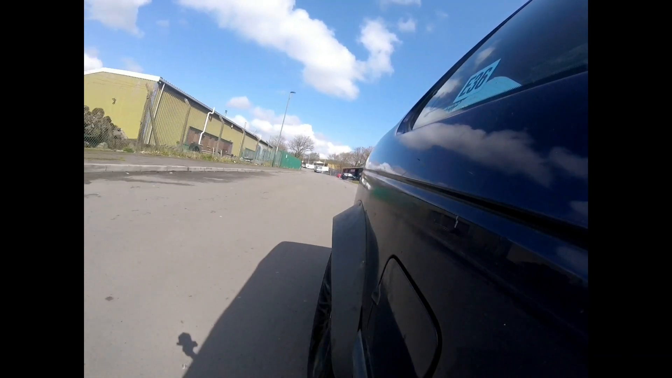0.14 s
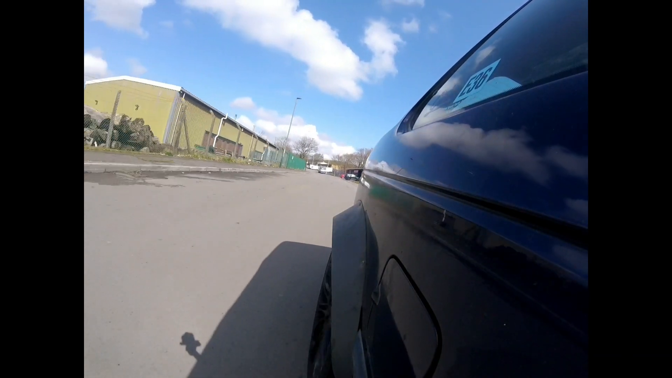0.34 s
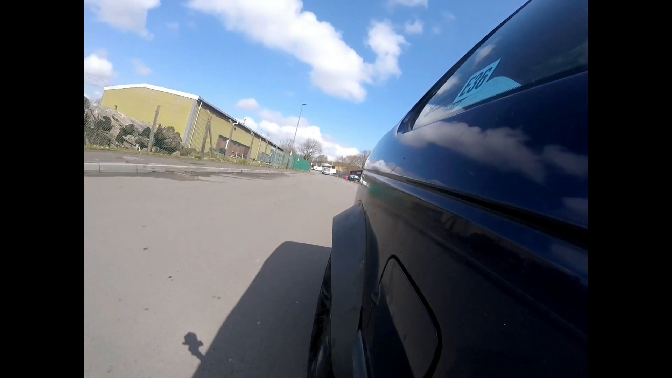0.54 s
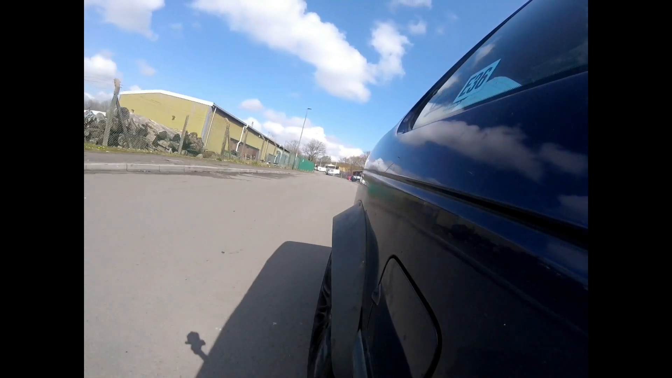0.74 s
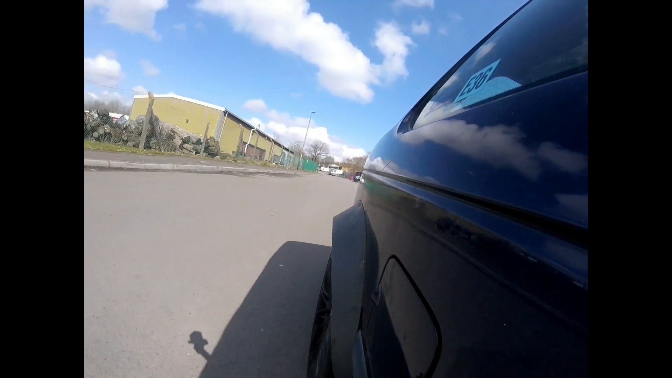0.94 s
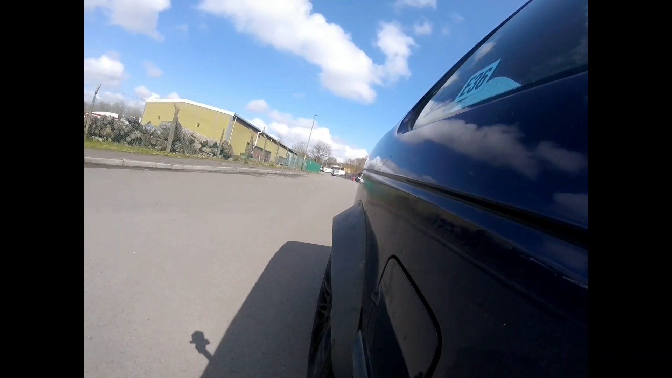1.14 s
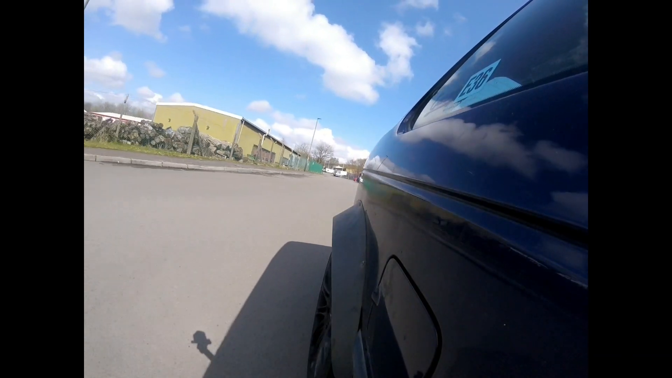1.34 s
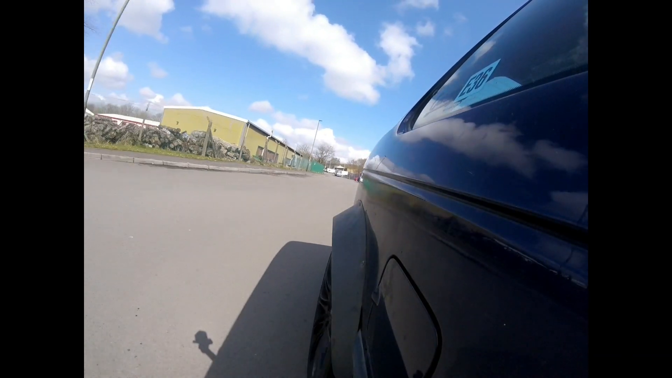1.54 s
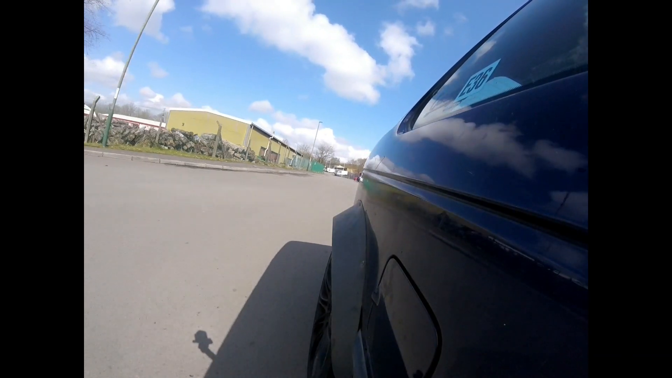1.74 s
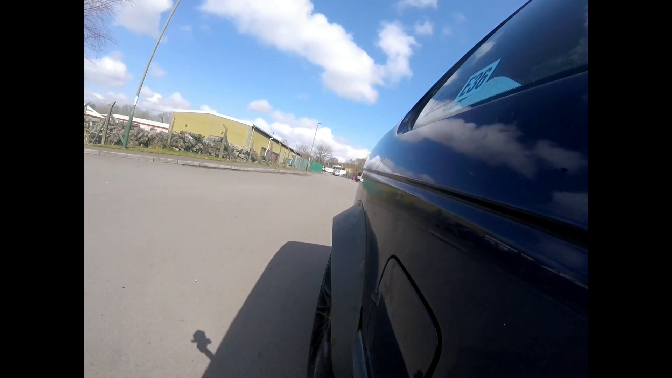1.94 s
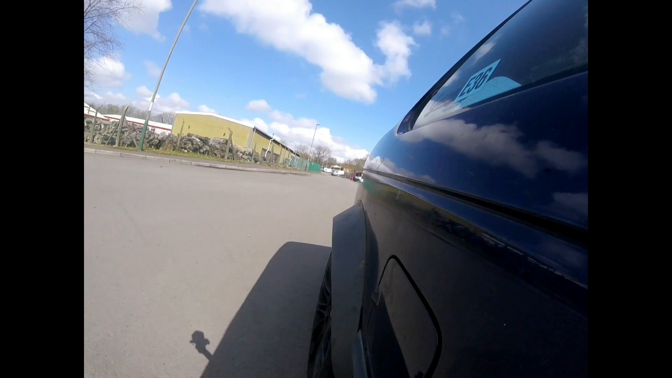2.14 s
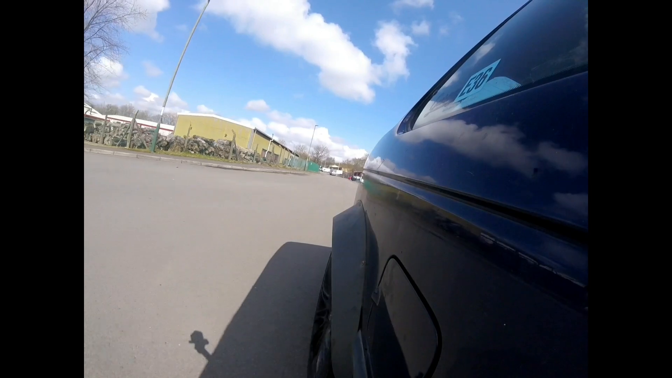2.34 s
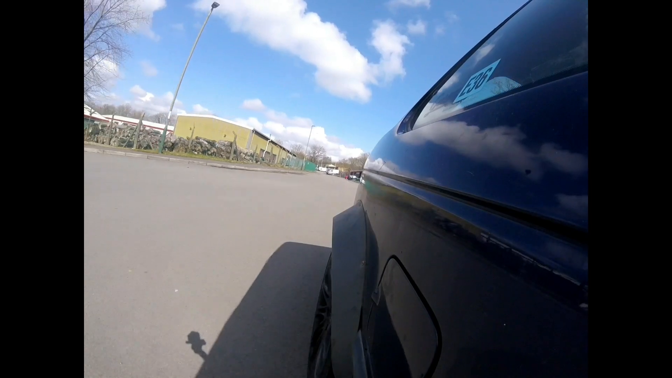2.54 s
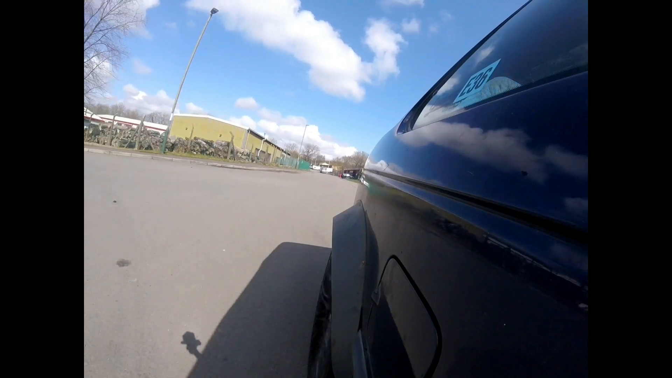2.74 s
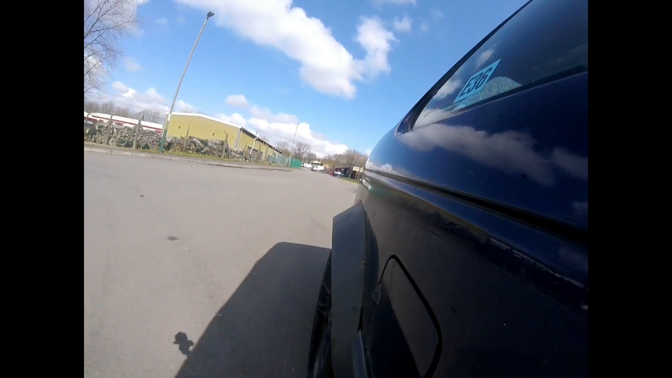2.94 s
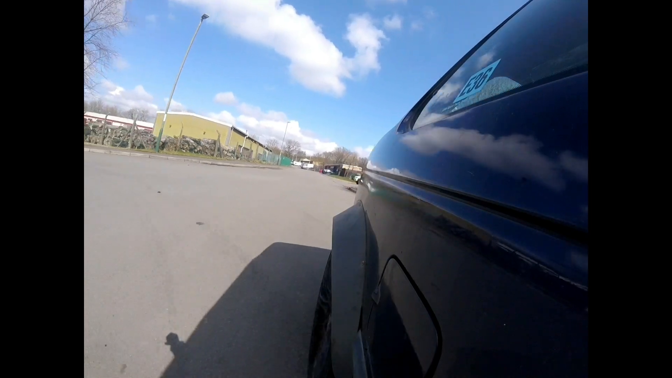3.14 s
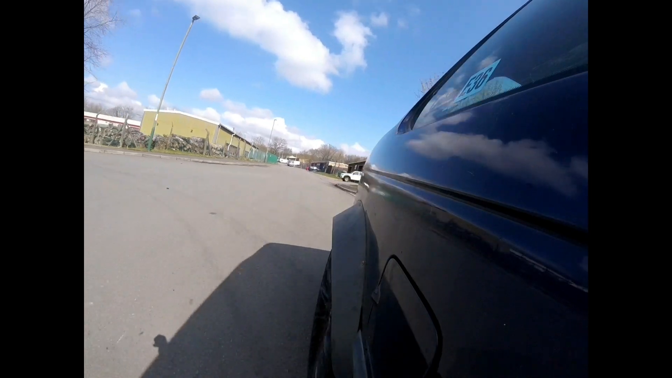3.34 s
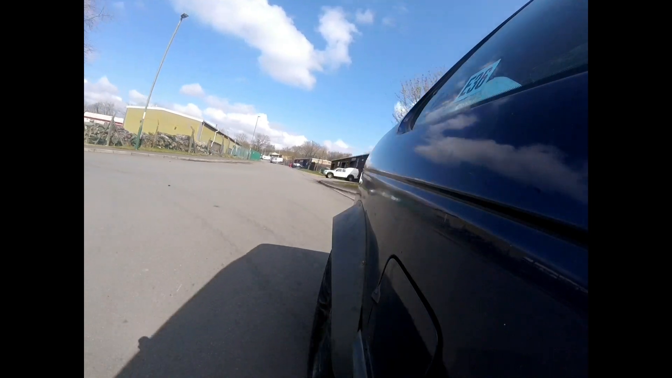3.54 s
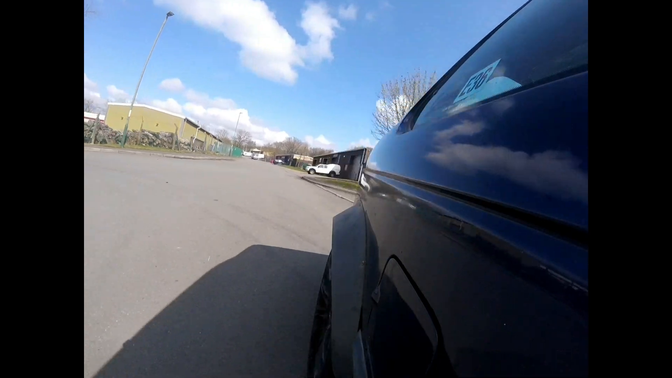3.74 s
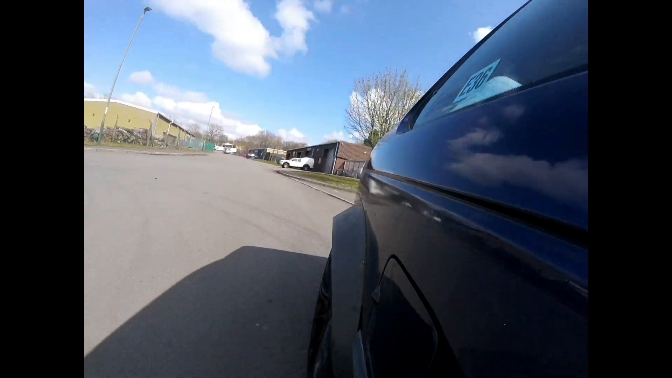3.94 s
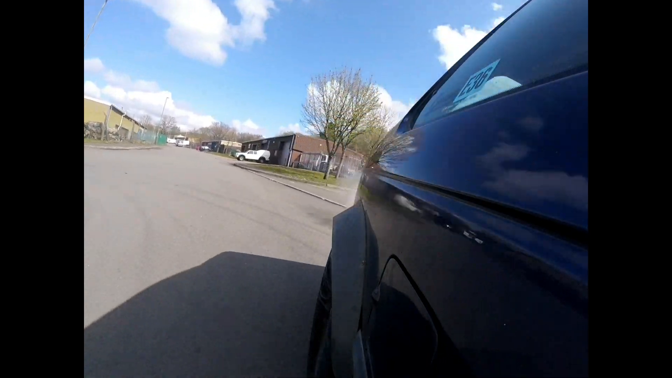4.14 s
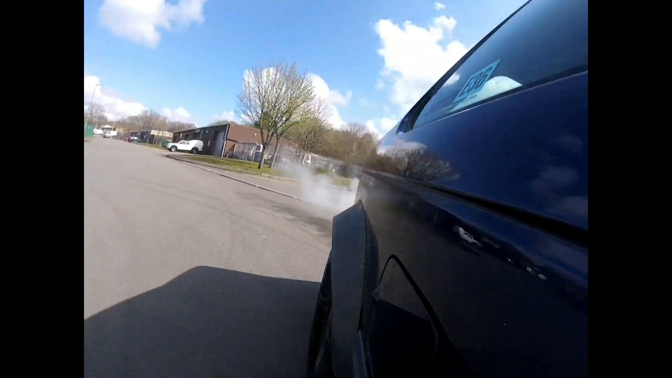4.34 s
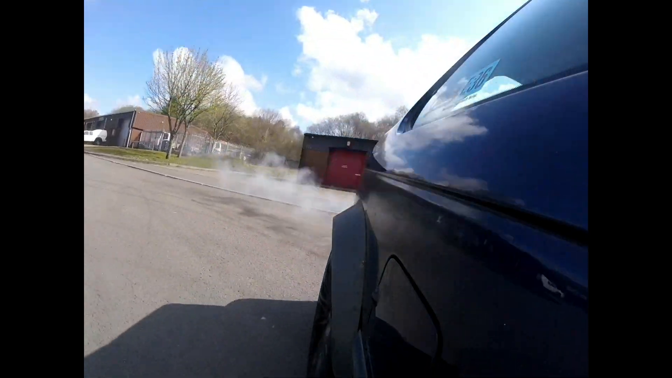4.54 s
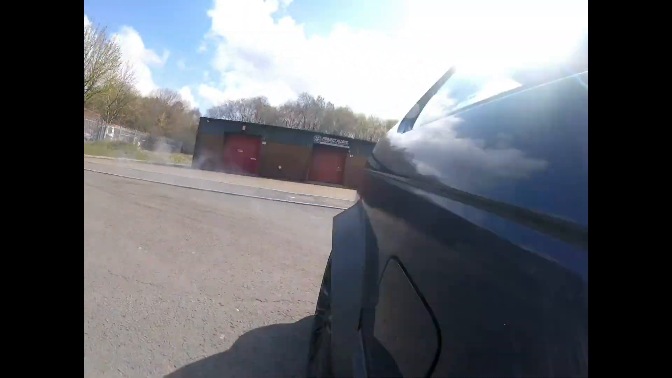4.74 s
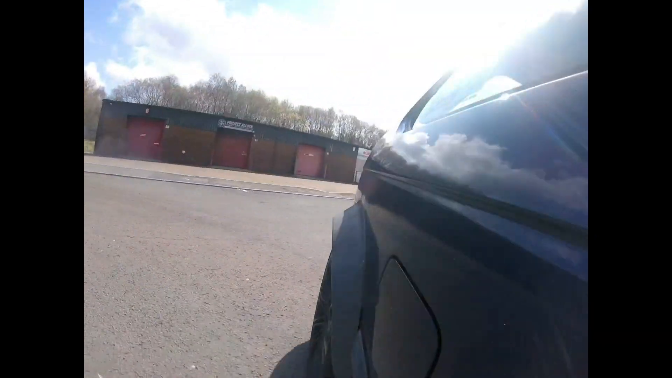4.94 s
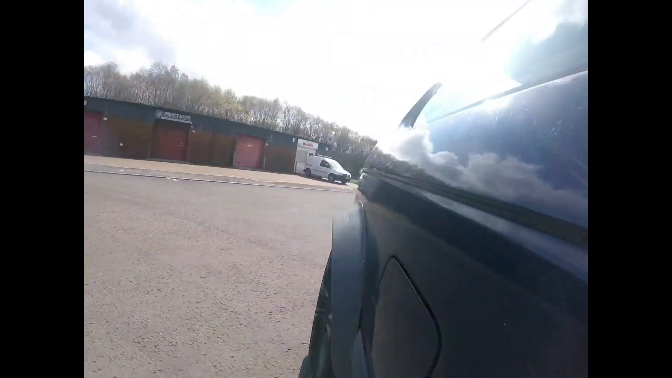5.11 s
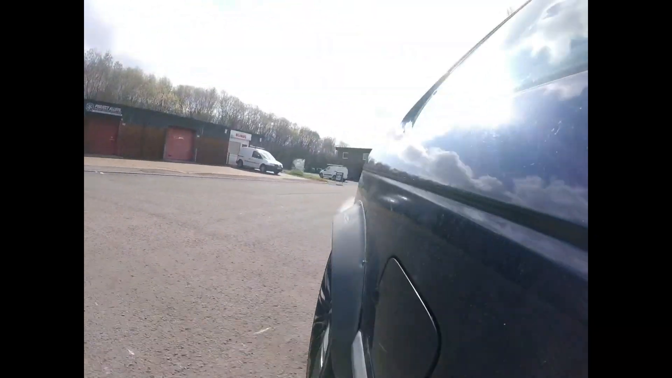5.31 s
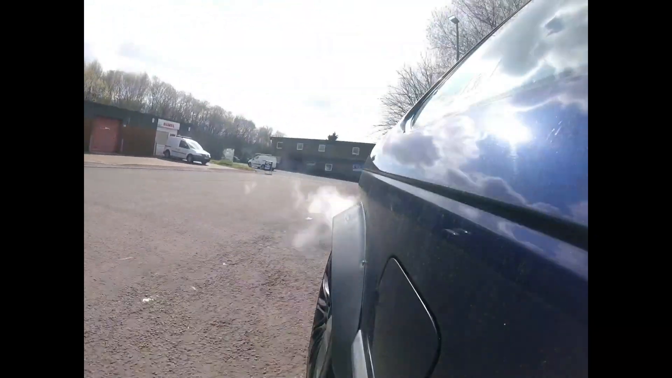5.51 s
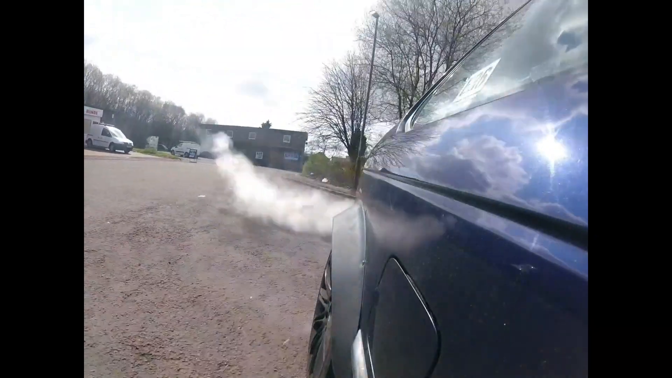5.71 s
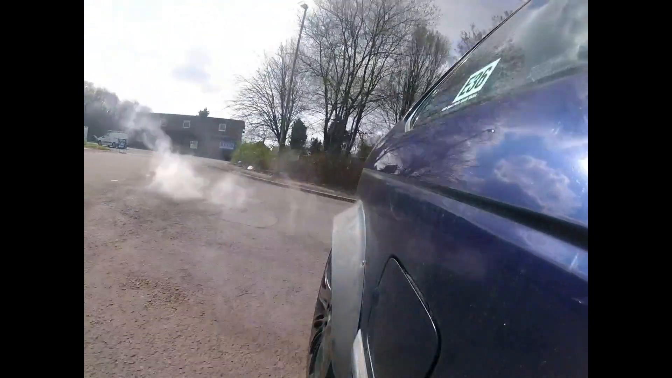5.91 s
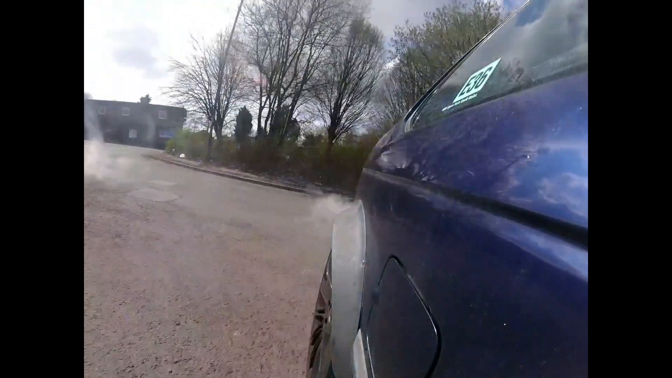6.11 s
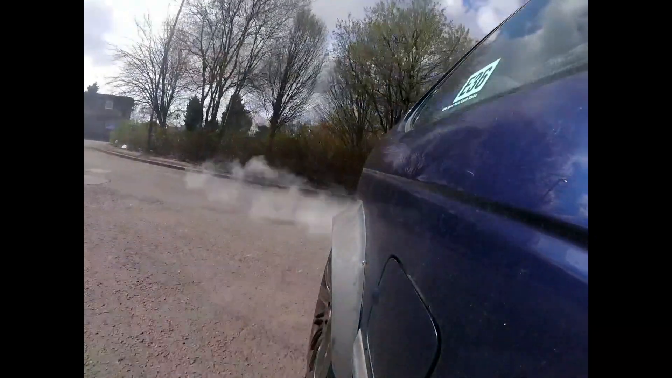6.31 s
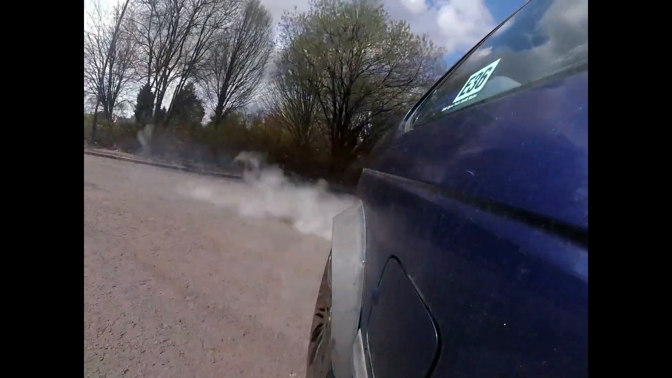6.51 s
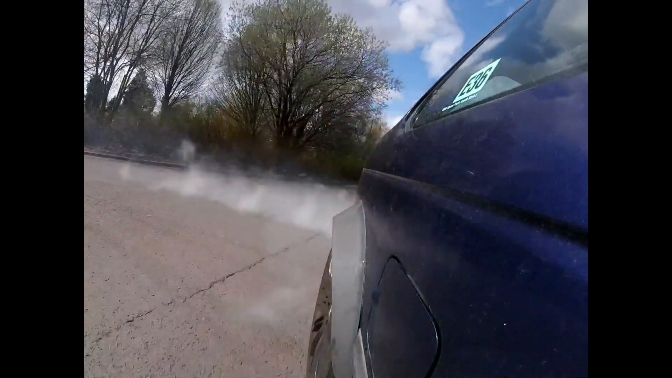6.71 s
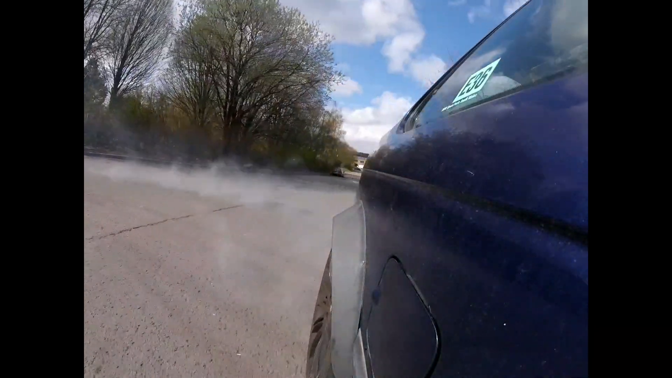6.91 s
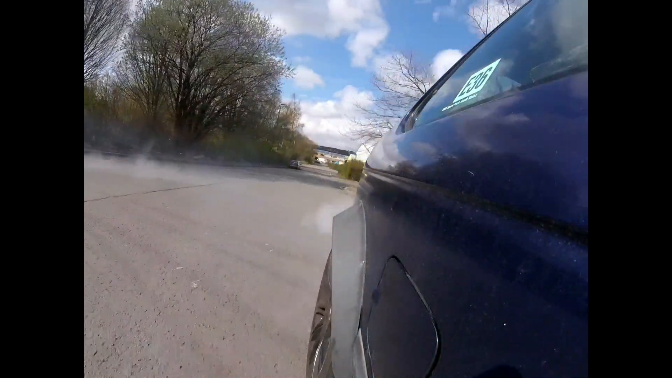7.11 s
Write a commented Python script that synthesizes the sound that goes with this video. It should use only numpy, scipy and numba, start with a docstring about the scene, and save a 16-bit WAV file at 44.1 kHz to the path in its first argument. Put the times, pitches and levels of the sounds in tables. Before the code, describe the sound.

A microphone mounted on the side of a car in an open car park catches wind thumps and a booming, humming roll over tarmac. After about three seconds the six-cylinder engine revs up steeply, the tyres chirp, then scrub and squeal continuously with gritty hiss. The note drops, pops thud in the pipe, and it surges again twice. Close, dry, bass-heavy and slightly saturated.

```python
"""Car rolling, revving and sliding

A six-cylinder car rolls across tarmac, then is revved hard and slides with spinning rear tyres.
The microphone sits in a small housing on its flank. Wind, panel boom, road roar and squeals are shaped noise;
the exhaust note is a stack of sine waves; stones and overrun pops are short rings that die away."""
import sys
import numpy as np
from scipy import signal
from scipy.fft import rfft, irfft
from scipy.io import wavfile
from scipy.ndimage import uniform_filter1d
from numba import njit

SR = 44100
rng = np.random.default_rng(int(sys.argv[2]) if len(sys.argv) > 2 else 0)


def wrap_up_sound(samples):
    """Save the sound to the file named by the first command line argument, as 16-bit audio."""
    columns = np.atleast_2d(samples).T
    # keep every value between -1 and 1, then stretch to whole-number steps
    tamed = np.clip(columns, -1, 1)
    steps = np.round(tamed * 32767).astype(np.int16)
    wavfile.write(sys.argv[1], SR, steps)


def volts_from_decibels(level):
    """Turn decibel levels (scalar or array-like) into linear amplitude factors."""
    exponent = np.asarray(level, float) / 20
    return 10 ** exponent


N = 320166
T = np.arange(N) / SR  # time of every sample in seconds

# Air and road around the rolling car. Each row: time in seconds, then levels in dB of wind buffet,
# panel boom, body drumming, rolling roar and air hiss.
DRIVE = [(0, -18.5, -43, -32, -36.5, -61.5), (.3, -21.5, -26, -29.5, -35.5, -59),
         (.65, -24.5, -22, -33, -35.5, -58), (.85, -24, -32, -30, -35.5, -58),
         (1.2, -20.5, -20.5, -29, -36, -57.5), (1.5, -16, -27, -28.5, -37.5, -55.5),
         (1.65, -18, -27.5, -32, -35.5, -56.5), (2.0, -24.5, -31, -34.5, -37.5, -55.5),
         (2.3, -22, -22.5, -35, -40, -58), (2.7, -26.5, -27, -35.5, -40, -57.5),
         (2.9, -27, -26, -35, -42.5, -58), (3.1, -21.5, -40, -39.5, -43, -59),
         (3.37, -27, -31, -38.5, -47.5, -58), (3.47, -24, -29, -33, -47, -60),
         (3.55, -33, -30, -29.5, -40, -54.5), (3.75, -28, -25, -31, -36, -50),
         (3.9, -30.5, -35, -29, -29.5, -48.5), (4.2, -38, -24, -32.5, -30, -42.5),
         (4.55, -24, -24, -24, -28, -52), (5.0, -24, -28.5, -32, -34.5, -62),
         (5.7, -17, -23, -25, -27.5, -48.5), (6.0, -23, -27.5, -29, -31, -57),
         (6.15, -26, -25, -29, -30, -64), (6.22, -20.5, -24, -33, -33, -58), (6.4, -28, -20, -27, -36, -48),
         (7.26, -22, -37, -33.5, -36, -54.5)]
# Colours of the wind buffet, body drumming, rolling roar and air hiss.
# Each row: frequency in Hz, relative strength in dB per Hz.
BUFFET_COLOUR = [(14, -39), (24, -7), (43, 2), (70, -6), (100, -6), (160, -15.5), (250, -28.5)]
BODY_COLOUR = [(110, -12.5), (170, -0.5), (200, -0.5), (280, -0.5), (350, -10.5), (500, -11.5)]
ROLL_COLOUR = [(190, -31), (330, -1.5), (495, 0.5), (622, -5), (800, -8), (1100, -9.5), (1300, -11),
               (2000, -17.5), (2900, -30), (4500, -47.5), (5850, -69)]
HISS_COLOUR = [(1800, -11), (2800, 1.5), (4200, -10.5), (5200, -5), (6500, -4), (8000, -7), (9600, -9),
               (10300, -25.5)]
# Strong wind thuds on the housing. Each row: start in seconds, strength in dB (3 dB above the top rms).
THUDS = [(0.044, -19), (0.903, -12), (1.058, -12), (1.489, -12), (3.067, -34), (3.56, -38), (3.64, -15),
         (3.78, -13), (5.41, -13.5), (5.572, -13.5), (6.37, -21)]
# Bumps in the tarmac that shake the panel. Each row: start in seconds, strength in dB (as for the thuds).
JOLTS = [(0.207, -16), (0.596, -28), (1.032, -24), (1.243, -16), (1.841, -31), (1.985, -12), (2.134, -20.5),
         (2.562, -17.5), (2.679, -18), (2.939, -18.5), (3.057, -20), (3.274, -24)]
THUD_RISE_S, JOLT_RISE_S = 0.026, 0.012  # time to the top of each swell
GUSTY_DB, BUMPY_DB = 1, 1.5  # spread of the quick swells of wind and boom
# The wavering pitch of the panel boom. Each row: time in seconds, pitch in Hz.
BOOM_PITCH = [(0, 124.4), (.3, 129.7), (.43, 137.4), (.52, 125.3), (.72, 137), (.95, 126), (1.1, 144),
              (1.28, 134), (1.42, 137.5), (1.7, 127), (1.86, 140.6), (2.0, 117.5), (2.17, 136.2),
              (2.38, 136.6), (2.46, 122.4), (2.62, 129), (2.8, 143), (3.0, 131.7), (3.35, 129.7),
              (4.5, 131.3), (5.38, 137.2), (6.03, 139), (6.18, 123), (6.33, 131.7), (6.45, 117.6),
              (6.65, 135), (7.26, 126)]
# The boom's tone, and the duller drumming around it; each width is for one of two filter passes
BOOM_WIDTH_HZ, BOOM_SKIRT_HZ, BOOM_SKIRT_DB = 18.8, 44.3, -12
BOOM_STEADY_S = 0.12  # the panel rings evenly over this time
# Tread hum. Each row: pitch in Hz, width of one filter pass in Hz, relative level in dB.
HUM_BANDS = [(505, 70, 3), (682, 20, 4.5), (905, 123, 8.5), (1030, 85, 7)]
HUM_DB, HUM_GAINS_DB_PER_S = -4, 1.28  # hum over the roar at time 0, and its gain on the roar each second
HUM_SWELL_DB, HUM_DRIFT, BODY_FLICKER_DB = 1.2, 0.015, 1.5  # drift is a fraction of the pitch

# Stones flung against the panel. Each row: start in seconds, strength in dB.
STONES = [(1.4446, -9), (1.4549, -21), (1.7095, -24), (3.375, -36), (3.648, -33), (3.749, -33)]
# Rings of the struck panel. Each row: pitch in Hz, relative level in dB, time to fall 60 dB in seconds.
PANEL_RINGS = [(1240, 3, 0.006), (835, -11, 0.03), (1010, -11, 0.03), (1600, -12, 0.015),
               (3130, -15, 0.005), (6560, -12, 0.0019), (9000, -14, 0.0022)]

# Grit spitting briefly in the treble. Each row: middle in seconds, level in dB, length in seconds.
SPITS = [(1.709, -51.5, 0.008), (3.375, -55, 0.0072), (3.485, -57, 0.02), (3.503, -49.5, 0.015),
         (3.565, -51, 0.022), (3.615, -48.5, 0.0097), (3.652, -44, 0.0065), (3.75, -51, 0.0068),
         (5.505, -42, 0.01), (6.24, -44, 0.005)]
# Colour of the grit. Each row: frequency in Hz, relative strength in dB per Hz.
GRIT_COLOUR = [(2200, -6.5), (3000, -4.5), (4300, -12.5), (5200, -6), (6500, -7.5), (8000, -10),
               (9200, -14.5), (10000, -26.5)]
# Rear tyres sliding. Each row: time in seconds, scrub level in dB, grit hiss level in dB.
SLIDE = [(3.4, -54, -71), (3.5, -42, -54.5), (3.58, -62, -75), (3.68, -46.5, -56.5), (3.72, -52, -56.5),
         (4.14, -35, -48), (4.165, -23.5, -42), (4.25, -25, -39), (4.31, -20, -40.5), (4.37, -25.5, -38.5),
         (4.46, -25, -38.5), (4.59, -22, -38), (4.75, -23.5, -44), (5.15, -20.5, -46), (5.45, -22, -45.5),
         (5.64, -24.5, -45), (5.77, -23.5, -45.5), (5.85, -22, -42), (5.97, -21, -45.5), (6.04, -23, -45.5),
         (6.14, -23, -49.5), (6.23, -24.5, -47.5), (6.5, -23, -47), (6.7, -22, -42), (6.91, -20, -39.5),
         (7.1, -21.5, -46.5), (7.26, -24.5, -43.5)]
# The wheel bites (boost) or skips clear of the road (dip).
# Each row: middle in seconds, change in dB, length in seconds.
HOPS = [(3.49, 9, 0.03), (3.67, 12, 0.066), (4.2, 1.5, 0.03), (4.37, -2.5, 0.018), (4.425, 7.5, 0.043),
        (4.47, -4, 0.03), (4.575, -5, 0.02), (4.502, 6.5, 0.026), (4.535, 4, 0.023), (4.612, 3, 0.037),
        (4.923, 2, 0.006), (4.956, 1, 0.006), (5.93, 2, 0.037), (6.24, 3, 0.01), (6.6, 2.5, 0.027)]

# Firing note, one list per stretch of revving. Each row: time in seconds, firing rate in Hz, note level in dB.
REVS = [
    [(3.36, 48.3, -45), (3.395, 55, -22), (3.43, 62.1, -21), (3.49, 72.3, -17.5), (3.576, 97.5, -17),
     (3.656, 124.5, -18.5), (3.794, 165.3, -15.5), (3.89, 202.8, -15), (3.996, 235.6, -11),
     (4.116, 261.2, -15), (4.2, 250.2, -14.5), (4.3, 261, -14.5), (4.45, 278.1, -18.5), (4.61, 298, -19.5),
     (4.69, 280, -21.5), (4.746, 260, -18), (4.808, 239.3, -30.5), (4.95, 230.3, -37)],
    [(5.24, 145.3, -34), (5.36, 154.5, -18), (5.44, 167.3, -20.5), (5.54, 185.3, -25), (5.76, 229.4, -15.5),
     (5.885, 253.6, -18), (5.91, 253, -33), (5.98, 264, -32)],
    [(6.2, 195.6, -32), (6.284, 208.3, -20), (6.476, 237.4, -15), (6.712, 274, -21), (6.882, 298.5, -19.5),
     (7.022, 286, -34), (7.038, 281.7, -22.5), (7.1, 260, -31), (7.158, 236, -31.5), (7.26, 239.2, -9.5)],
]
# Tones beside the firing note. Each value: pitch in sixths of the firing rate.
ORDERS = [1, 2, 3, 4, 5, 7, 8, 9, 10, 11, 12, 13, 14, 15, 16, 18, 20, 22, 24, 27, 30]
# Relative levels of those tones. Each value: level in dB.
ORDERS_DB = [4.5, 2, 3.5, 2, -5.5, -9.5, 3.5, -15, -4, -9.5, 4, -13, -7.5, -18, -1, -5, -6.5, -4, -6.5,
             -5.5, -14]
# What the silencer lets through. Each row: frequency in Hz, gain in dB.
SILENCER = [(20, -9), (45, -6), (90, -6), (150, -8), (200, 0), (260, -1), (290, -5), (315, -10), (350, -18),
            (400, -14), (460, -18), (540, -14)]
SILENCER_TOP_HZ = 450  # above this the silencer cuts steeply
# Throttle open. Each row: start in seconds, end in seconds, level in dB of the uneven-firing
# tones at the start, their level in dB at the end.
THROTTLE = [(3.387, 4.634, -23.5, -27), (5.3, 5.886, -27, -27), (6.227, 6.948, -31.5, -25),
            (7.192, 7.297, -27, -27)]
LIFT_DB, PEDAL_S = -41, 0.046  # level of those tones off throttle; time the pedal takes
SHUDDER, SHUDDER_DB = 0.008, 1.1  # the slipping driveline shakes pitch (a fraction) and level of the note

# Colour of the tyre scrub. Each row: frequency in Hz, relative strength in dB per Hz.
SCRUB_COLOUR = [(260, -31), (412, -16), (720, -5.5), (860, 0), (1200, -3), (1600, -7), (2250, -15.5),
                (3300, -28), (4500, -37.5), (6000, -60)]
# Squeals of the tread blocks: low, middle, high. Each row: pitch in Hz (the low one follows LOW_SQUEAL
# instead), width of one filter pass in Hz, relative level in dB.
TREAD = [(875, 200, -2), (1060, 190, -2), (1450, 300, -5)]
# The moving pitch of the lowest squeal. Each row: time in seconds, pitch in Hz.
LOW_SQUEAL = [(3.4, 867), (4.6, 914), (5.3, 901), (6.15, 890), (6.5, 953), (6.9, 1030), (7.26, 910)]
# Balance of the three squeals. Each row: time in seconds, then low, middle and high squeal in relative dB.
SQUEAL_BALANCE = [(3.4, -4, -8, 0), (3.52, -4, -9, 0), (3.67, -2, -9, 7.5), (3.9, 16, -15, 3),
                  (4.2, 1.5, -15, 6), (4.32, -11, -2, 5), (4.42, -12, 2, 4.5), (4.6, -15, -2.5, -7),
                  (5.15, -6, -6, -11.5), (5.7, 3.5, -2.5, -20), (5.95, 0.5, -6, -5.5), (6.05, -1, 0, -14),
                  (6.15, 1, -6, -11), (6.25, -3, 0.5, -19), (6.5, -3.5, -4.5, -5), (6.7, -10, -9.5, -6),
                  (6.9, -7.5, -14, -5), (7.26, -12, -7.5, -9.5)]
# Wheel arch ringing with the scrub. Each row: pitch in Hz, width of one filter pass in Hz, relative level in dB.
ARCH = [(407, 77, -15.5), (521, 59, -15.5)]
SQUEAL_FROM_S = 4.4  # the tyres let go fully
PATCHY_DB, SQUEAL_STEADY_S = 1.2, 0.1  # each squeal comes in short bursts, even over longer times

# Overrun pops in the exhaust. Each row: start in seconds, strength in dB, pitch in Hz,
# time for the ring to fall 60 dB in seconds.
POPS = [(4.98, 1.5, 95.5, 0.018), (5.015, -15, 97, 0.29), (5.89, -19, 60.4, 0.12), (6.02, -0.5, 111, 0.047),
        (6.064, 6, 60, 0.034), (6.0945, -1, 95, 0.033), (6.103, -3.5, 59.6, 0.044), (6.144, 3, 46, 0.05),
        (6.954, -12, 63.6, 0.08), (6.991, -1, 102, 0.045), (7.085, -12, 89.4, 0.22)]
# Microphone port resonances. Each row: pitch in Hz, width in Hz, boost in dB.
HOUSING = [(5590, 980, 5), (6525, 320, 8.5)]


def unit(x):
    """Scale to an rms of 1."""
    return x / np.sqrt(np.mean(x ** 2))


def columns(table):
    """Turn each column of a timed table into a curve with one value a sample."""
    s, *cols = np.transpose(table)
    return [np.interp(T, s, c) for c in cols]


def colour(points, hz):
    """Read a spectrum in dB between its points on a log-frequency axis."""
    f, db = np.transpose(points)
    return np.interp(np.log(hz), np.log(f), db)


@njit
def svf(x, hz, width):
    """Band-pass with a moving centre, gain 1 at the centre."""
    y, band, low = np.empty(len(x)), 0., 0.
    for i in range(len(x)):
        g, k = np.tan(np.pi * hz[i] / SR), width / hz[i]
        v = (band + g * (x[i] - low)) / (1 + g * (g + k))
        band, low, y[i] = 2 * v - band, low + 2 * g * v, k * v
    return y


def walk(rate):
    """Smoothed random levels, about rate new ones a second, with an rms of 1."""
    k = int(SR / rate)
    held = np.repeat(rng.standard_normal(N // k + 1), k)
    return unit(uniform_filter1d(uniform_filter1d(held, k), k)[:N])


def noise(points, flicker_db, rate):
    """Noise of a given colour whose octaves flicker separately."""
    f = np.maximum(np.fft.rfftfreq(N, 1 / SR), 1)
    spectrum = rfft(rng.standard_normal(N)) * volts_from_decibels(colour(points, f))
    octave = np.log2(f)
    lowest, highest = int(np.log2(points[0][0])), int(np.log2(points[-1][0])) + 1
    out = 0
    for centre in range(lowest, highest + 1):
        band = irfft(spectrum * np.clip(1 - abs(octave - centre), 0, 1), N)
        out = out + band * volts_from_decibels(flicker_db * walk(rate))
    return unit(out)


def resonances(x, modes, drift, rate):
    """Noise rung twice through modes whose pitch wanders, each at rms 1 before its own level."""
    out = []
    for hz, width, db in modes:
        centre = hz * (1 + drift * walk(rate))
        once = svf(x, centre, 1. * width)
        out.append(volts_from_decibels(db) * unit(svf(once, centre, 1. * width)))
    return out


def even(x, s):
    """Iron out a noise's own swells slower than s, so that it follows its level curve."""
    k = int(s * SR)
    power = uniform_filter1d(uniform_filter1d(x ** 2, k), k)
    return unit(x / np.sqrt(power + .05))


def swells(table, rise_s):
    """Rms gain that rises from each listed time, tops out after rise_s and dies away."""
    out = 0
    for s, db in table:
        age = np.maximum(T - s, 0) / rise_s
        out = out + volts_from_decibels(db) / np.sqrt(2) * age * np.exp(1 - age)
    return out


def bumps(table, gain):
    """Bell-shaped swells at the listed times."""
    return sum(gain(db) * np.exp(-.5 * ((T - s) / (length / 2)) ** 2) for s, db, length in table)


def ring(t, hz, t60):
    """A pure tone struck at t = 0 that falls 60 dB in t60 seconds."""
    return np.sin(2 * np.pi * hz * t) * np.exp(-np.log(1000) * t / t60)


def add(out, s, sound):
    """Mix a short sound in at time s."""
    i = int(s * SR)
    out[i:i + len(sound)] += sound[:N - i]


def wind(wind_db, hiss_db):
    """Moving air buffets and thuds on the housing as low noise, and hisses in the treble."""
    gusts = volts_from_decibels(wind_db + GUSTY_DB * walk(17))
    level = np.hypot(gusts, swells(THUDS, THUD_RISE_S))
    buffet = even(noise(BUFFET_COLOUR, 0.16, 9.6), 0.12)
    return level * buffet + volts_from_decibels(hiss_db) * noise(HISS_COLOUR, 1.0, 15)


def panel_boom(boom_db):
    """The road shakes a panel, which turns noise into a deep tone of wavering pitch."""
    shake = np.hypot(volts_from_decibels(boom_db + BUMPY_DB * walk(14)), swells(JOLTS, JOLT_RISE_S))
    hz, = columns(BOOM_PITCH)
    modes = [(hz, BOOM_WIDTH_HZ, 0), (hz.mean(), BOOM_SKIRT_HZ, BOOM_SKIRT_DB)]
    boom = sum(resonances(rng.standard_normal(N), modes, 0.009, 7.7))
    return shake * even(boom, BOOM_STEADY_S)


def body_drumming(body_db):
    """The road drums the car body: a fairly even low noise."""
    return volts_from_decibels(body_db) * noise(BODY_COLOUR, BODY_FLICKER_DB, 14)


def rolling_tyres(roll_db):
    """Rolling treads make a broad roar, and a hum that fades out as the slide begins."""
    sliding = np.clip((T - SLIDE[0][0]) / 0.29, 0, 1)
    # As the car slows, the roar fades faster than the hum
    hum_db = roll_db + HUM_DB + HUM_GAINS_DB_PER_S * T + HUM_SWELL_DB * walk(4.58)
    hum = unit(sum(resonances(rng.standard_normal(N), HUM_BANDS, HUM_DRIFT, 4.95)))
    return volts_from_decibels(hum_db) * (1 - sliding) * hum + volts_from_decibels(roll_db) * noise(ROLL_COLOUR, 2.2, 10.0)


def stones():
    """A tick on sheet metal, its onset softened by the brief push of a rounded stone."""
    out, t = np.zeros(N), np.arange(SR // 20) / SR
    push = 1 - np.exp(-t / 0.0003)
    tick = push * sum(volts_from_decibels(db) * ring(t, hz, t60) for hz, db, t60 in PANEL_RINGS)
    for s, db in STONES:
        add(out, s, volts_from_decibels(db) * tick)
    return out


def grit(on, bite_db, grip_db):
    """Thrown-up grit: short spits of treble noise, then a hiss under the slide."""
    hiss_db = columns(SLIDE)[1]
    hiss = on * volts_from_decibels(hiss_db + 0.3 * bite_db + 0.5 * grip_db)
    return (hiss + bumps(SPITS, volts_from_decibels)) * noise(GRIT_COLOUR, 0.85, 22)


def uneven_firing_db():
    """Level of the uneven-firing tones: low off throttle, raised while the pedal is down."""
    out = LIFT_DB
    for a, b, *db in THROTTLE:
        pedal = np.clip(np.minimum(T - a, b - T) / PEDAL_S + .5, 0, 1)
        out = out + (np.interp(T, [a, b], db) - LIFT_DB) * pedal
    return out


def engine():
    """A clean firing note; unequal cylinders add sixth orders that waver and fade above the silencer's cut."""
    out = np.zeros(N)
    waver = [volts_from_decibels((1.0 + .1 * k) * walk(14)) for k in ORDERS]  # higher orders are rougher
    phases = rng.uniform(0, 2 * np.pi, len(ORDERS_DB))
    scatter = volts_from_decibels(0.5 * walk(35) + SHUDDER_DB * walk(14))
    shudder = 1 + SHUDDER * walk(18)
    uneven_db = uneven_firing_db()
    for rev in REVS:
        hz, note_db = columns(rev)
        on = np.clip(np.minimum(T - rev[0][0], rev[-1][0] + 0.03 - T) / 0.04, 0, 1)
        cycle = 2 * np.pi * np.cumsum(hz * shudder) / SR / 6  # six firings in one cycle
        sound = volts_from_decibels(note_db) * scatter * np.sin(6 * cycle)
        for k, db, w, phase in zip(ORDERS, ORDERS_DB, waver, phases):
            order_hz = hz[::64] * k / 6  # every 64th sample is enough for the silencer
            passed = volts_from_decibels(colour(SILENCER, order_hz)) / (1 + (order_hz / SILENCER_TOP_HZ) ** 20)
            passed = np.repeat(passed, 64)[:N]
            sound += volts_from_decibels(uneven_db + db) * passed * w * np.sin(k * cycle + phase)
        out += np.sqrt(2) * on * sound  # a sine of rms 1
    return out


def squeals(slips):
    """Sticking and slipping tread blocks ring at three rough pitches that come in patches."""
    low = (columns(LOW_SQUEAL)[0], *TREAD[0][1:])
    tones = resonances(slips, [low] + TREAD[1:], .015, 14)
    out = 0
    for db, tone in zip(columns(SQUEAL_BALANCE), tones):
        out = out + volts_from_decibels(db + PATCHY_DB * walk(25)) * even(tone, SQUEAL_STEADY_S)
    return out * np.clip((T - SQUEAL_FROM_S) / 0.19, .3, 1)


def sliding_tyres(on, bite_db, grip_db):
    """Rubber sticks and slips: a broad scrub, squeals, and the ringing wheel arch."""
    scrub_db = columns(SLIDE)[0]
    judder = volts_from_decibels(2.0 * walk(70))
    slips = rng.standard_normal(N) * judder
    scrub = volts_from_decibels(-2.0) * np.sqrt(judder) * noise(SCRUB_COLOUR, 0.41, 30)
    arch = sum(resonances(slips, ARCH, 0.0061, 8.3))
    return on * volts_from_decibels(scrub_db + bite_db + grip_db) * (scrub + squeals(slips) + arch)


def pops():
    """Unburnt fuel goes off in the pipe: a soft push and a short low ring."""
    out, t = np.zeros(N), np.arange(SR // 4) / SR
    push = 1 - np.exp(-t / 0.0015)
    for s, db, hz, t60 in POPS:
        pipe = ring(t, hz, t60) + 0.34 * ring(t, 2.3 * hz, 0.49 * t60)
        add(out, s, volts_from_decibels(db) * pipe * push)
    return out


def scene():
    """All sources reach one microphone at close range."""
    wind_db, boom_db, body_db, roll_db, hiss_db = columns(DRIVE)
    driving = wind(wind_db, hiss_db) + panel_boom(boom_db) + body_drumming(body_db) + rolling_tyres(roll_db)
    on = np.clip((T - SLIDE[0][0]) / 0.045, 0, 1)
    bite_db = bumps(HOPS, float)
    grip_db = 0.3 * walk(11)  # grip changes move scrub, squeal and grit together
    sliding = grit(on, bite_db, grip_db) + sliding_tyres(on, bite_db, grip_db)
    return (driving + stones() + sliding + engine() + pops())[None]


def band_limit(x):
    """A steep low-pass at the top of the band."""
    return signal.sosfilt(signal.butter(12, 10600, fs=SR, output="sos"), x)


def record(dry):
    """The port lifts two treble bands, the input cuts the deepest bass and the top, and rounds the peaks."""
    x = dry[0]
    for hz, width, db in HOUSING:
        x = x + (volts_from_decibels(db) - 1) * svf(x, np.full(N, 1. * hz), 1. * width)
    x = signal.sosfilt(signal.butter(4, 24, "high", fs=SR, output="sos"), x)
    x = np.tanh(x) / 0.94
    x = signal.sosfilt(signal.butter(10, 9900, fs=SR, output="sos"), x)
    return band_limit(x[None])


dry = scene()
out = record(dry)
wrap_up_sound(out)
```